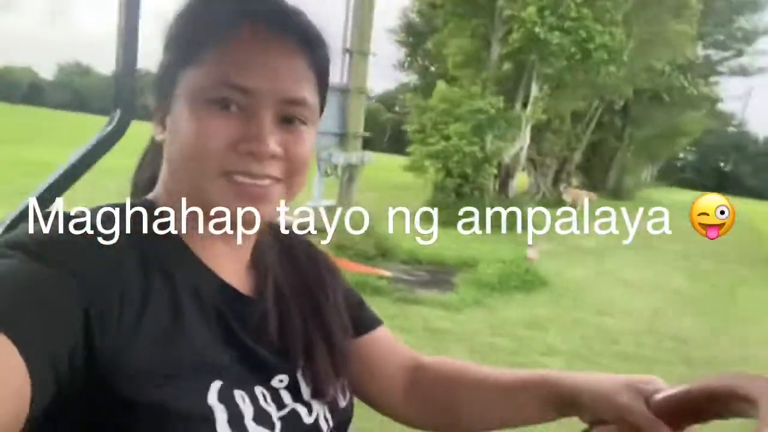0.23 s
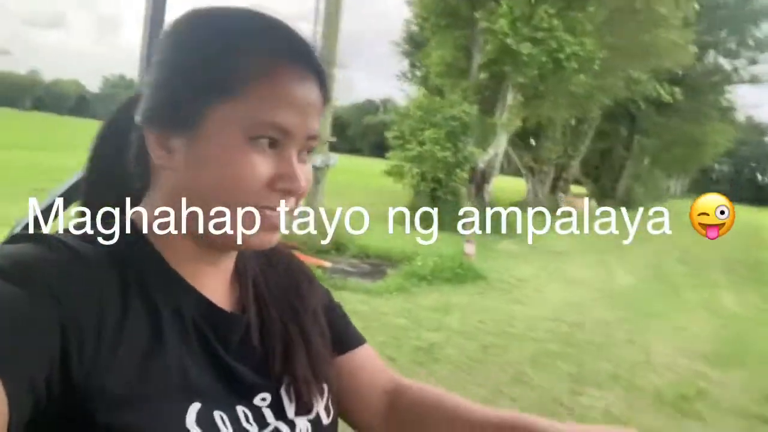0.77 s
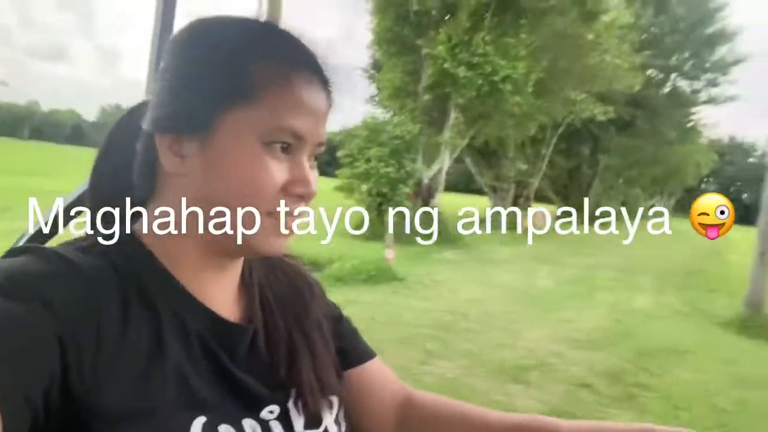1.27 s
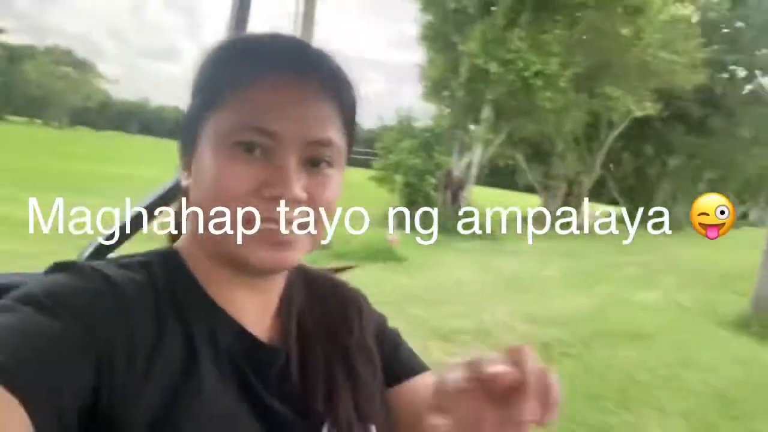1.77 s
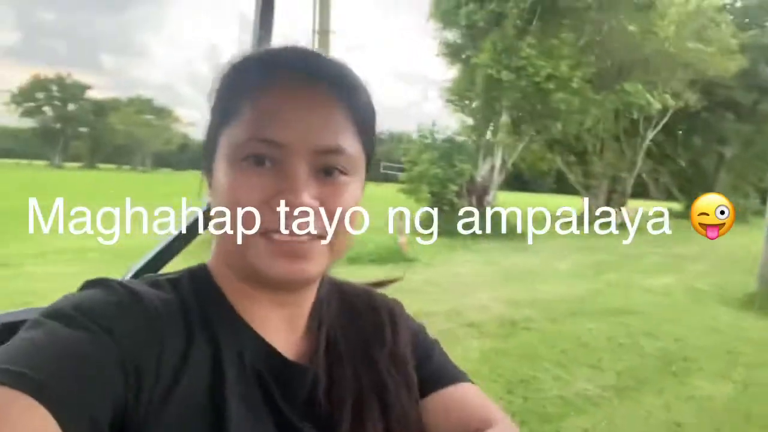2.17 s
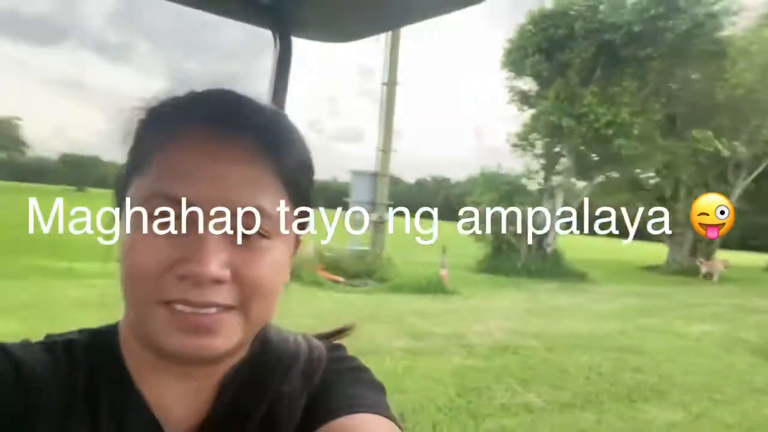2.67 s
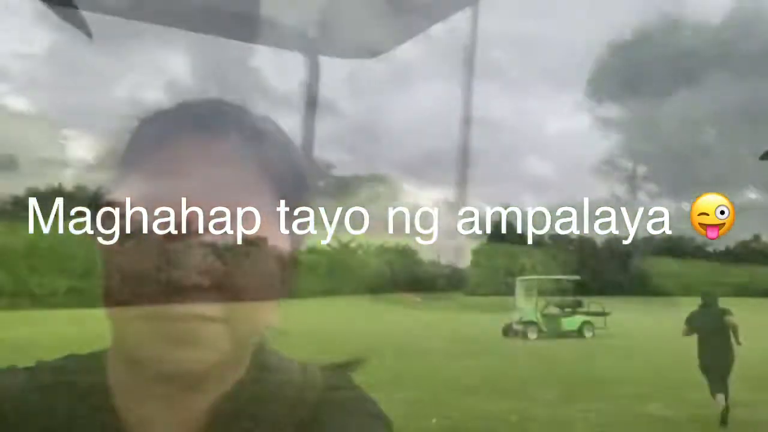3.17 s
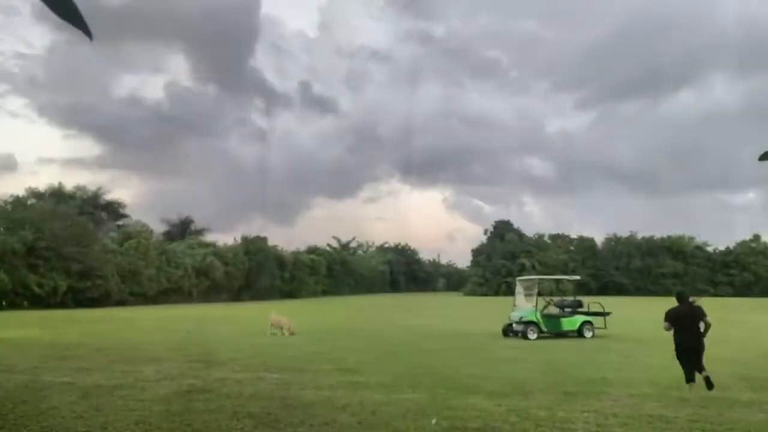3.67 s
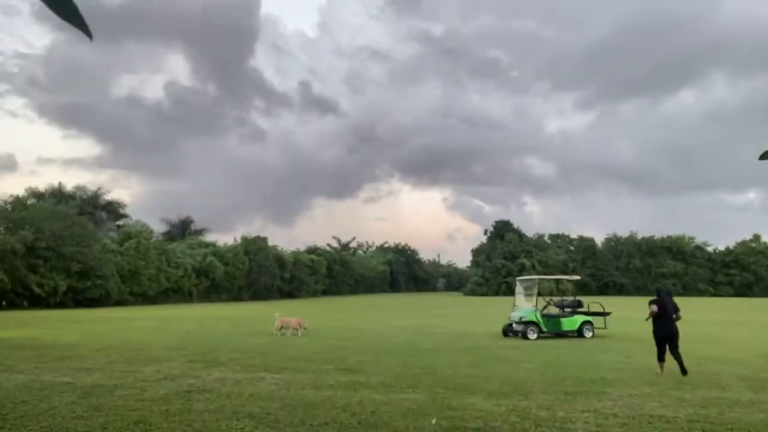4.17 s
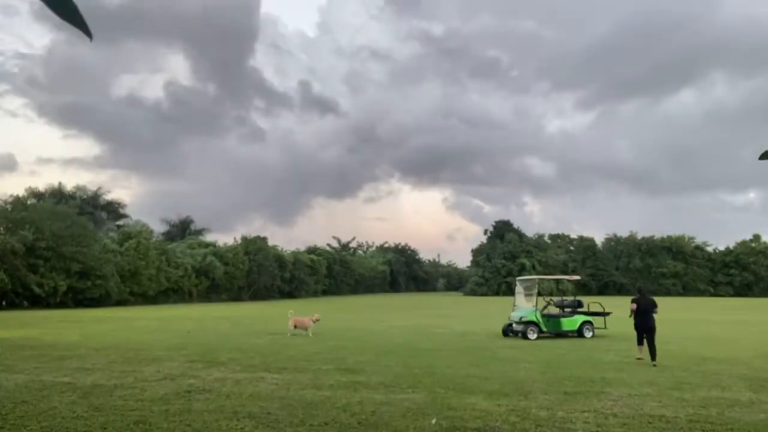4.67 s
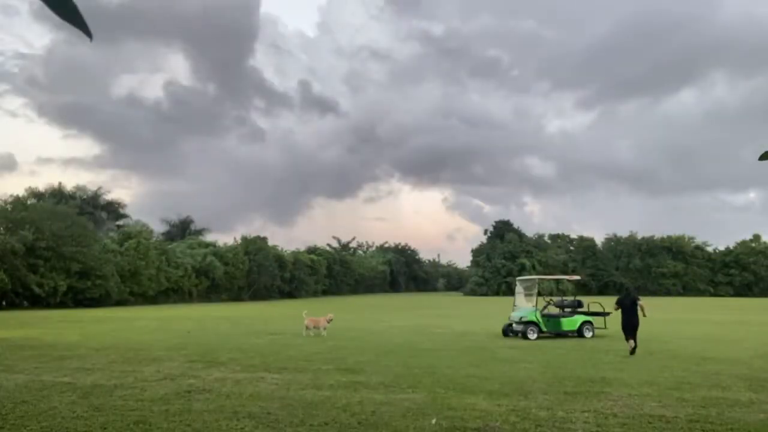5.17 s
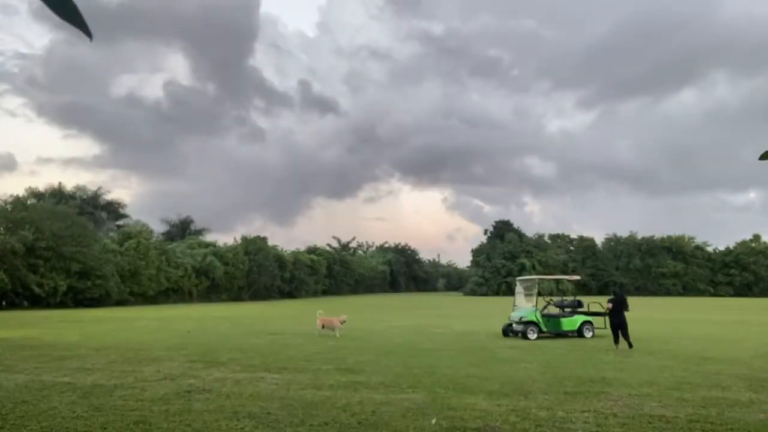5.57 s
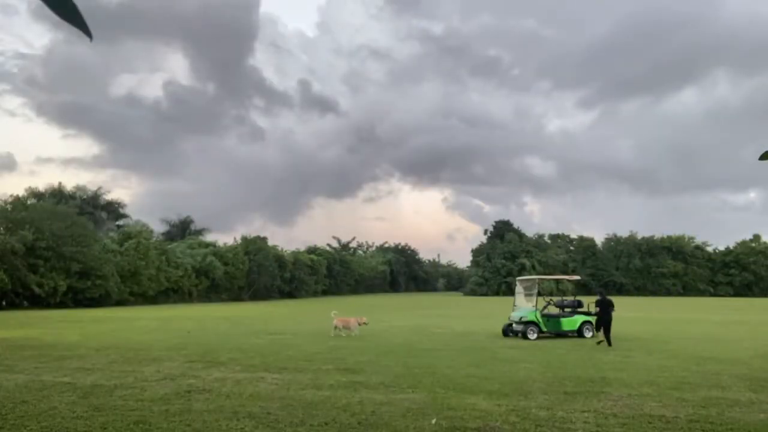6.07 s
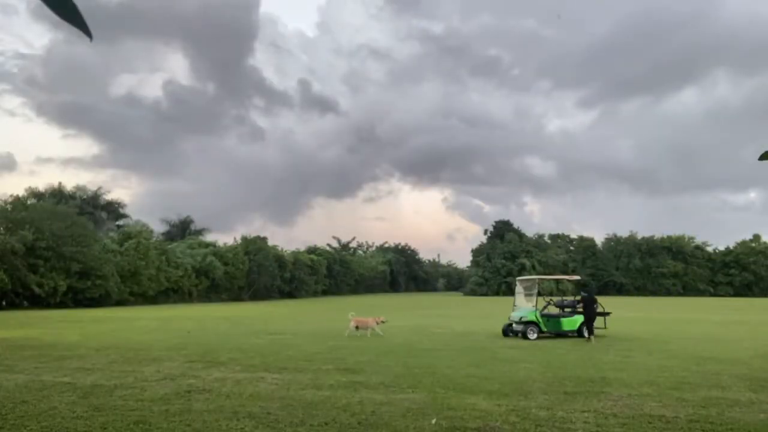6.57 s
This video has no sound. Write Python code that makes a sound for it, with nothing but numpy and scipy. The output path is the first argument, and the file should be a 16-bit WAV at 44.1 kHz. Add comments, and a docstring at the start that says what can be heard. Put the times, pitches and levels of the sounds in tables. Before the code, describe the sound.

A golf cart drives over a lawn, heard from the seat: a low engine drone that picks up a little speed, rumbling tyres and loose panels rattling on bumps. The ride cuts off abruptly, and a much quieter open field fades in. Crickets chirp in short, high phrases over a low traffic rumble, while a far car slowly speeds up and a distant motor hum swells once.

```python
"""A golf cart drones over a lawn, heard from the seat. Its engine picks up speed and kicks the body's
resonances, the tyres rumble, loose panels and fittings rattle on bumps. The ride cuts off and an open
field at dusk fades in: a low traffic rumble, a far car speeding up, a motor's hum, crickets chirping
with their wings in the hedge, a few brushes of grass and one faint bird peep."""
import sys
import numpy as np
from scipy.fft import rfft, irfft, next_fast_len
from scipy.io import wavfile
from scipy.ndimage import map_coordinates

SR = 44100
rng = np.random.default_rng(int(sys.argv[2]) if len(sys.argv) > 2 else 0)


def generate_wav(sig):
    """Save sig (samples, or channels by samples) to the path in sys.argv[1] as 16-bit PCM at SR."""
    pcm = np.round(np.clip(np.atleast_2d(sig).T, -1, 1) * 32767).astype(np.int16)
    wavfile.write(sys.argv[1], SR, pcm)


N = 300321
CUT_S = 2.652  # the ride ends

# noise spectra (frequency [Hz], relative density [dB])
RUMBLE_SPECTRUM = [(20, -38), (32, -27), (48, -6), (68, 3), (90, -0.5), (115, -6.5), (145, -1.5),
                   (180, -14.5), (230, -17.5), (340, -64), (600, -120)]
ROAD_SPECTRUM = [(120, -39), (230, -0.5), (400, -1), (500, -2.5), (650, 0.5), (950, -3.5), (1400, -14.5),
                 (2000, -25.5), (3000, -42), (5000, -44), (8500, -51), (10000, -76)]
TYRE_SPECTRUM = [(18, -41), (33, -7), (50, -6.5), (80, -1.5), (120, -3.5), (170, -2), (240, -12.5),
                 (330, -16), (700, -38.5), (1500, -45)]
CLATTER_SPECTRUM = [(150, -17.5), (300, 3), (600, 7), (1000, 0.5), (1650, -3.5), (2150, -4), (2600, -8.5),
                    (3400, -12), (4900, -18), (6300, -16.5), (8300, -21), (10000, -58.5), (13500, -28)]
CRACK_SPECTRUM = [(200, -8.5), (600, 11.5), (1400, -3), (2500, 0), (3600, -2), (5000, -11), (6500, -5.5),
                  (9000, -21), (13500, -22.5)]
# stereo image (frequency [Hz], left-right correlation [-1..1])
FIELD_CORR = [(60, 1), (130, 0.78), (280, -0.041), (610, -0.17), (1300, -0.24), (3000, 0.22)]
TYRE_CORR = [(30, .94), (130, 0.9), (250, 0.49), (420, 0.28), (700, 0)]
CART_CORR = [(130, 1), (250, 0.51), (420, 0.65), (700, -0.22), (1300, 0.27), (2000, -0.4), (3500, .1),
             (6000, 0.071), (8500, -0.45), (12000, 0.93)]

# far car's engine (time [s], firing rate [Hz])
CAR_FIRING = [(2.7, 120), (5.0, 166.5), (5.6, 181), (5.9, 193), (6.81, 220.5)]
# its harmonics 1-5 when nearest, before exhaust gain (level [dB])
CAR_HARMONICS_DB = [-57, -57.5, -70.5, -80, -77]
# its exhaust resonances (frequency [Hz], half-width [Hz], gain [dB])
EXHAUST_MODES = [(171, 17.3, 11), (332, 12.7, 4.5), (625, 34, 13), (995, 28, 10)]
# grass brushes (time [s], half-width [s], level [dB])
GRASS_BRUSHES = [(3.384, .03, -78), (3.737, .035, -75.5), (4.06, .035, -80.5)]
# dry grass ticks (time [s], level [dB])
GRASS_TICKS = [(3.655, -76.5), (3.853, -78), (5.455, -74), (5.7, -82)]
# far crickets (first phrase [s], pitch [Hz], level [dB])
FAR_CRICKETS = [(2.72, 6340, -62.5), (2.8, 6620, -66), (2.86, 6430, -61)]
# near cricket's phrases (start [s], chirps [count])
NEAR_PHRASES = [(2.936, 3), (3.211, 3), (3.48, 3), (3.785, 8), (4.305, 4), (4.635, 4), (4.972, 4),
                (5.248, 2), (5.42, 3), (5.67, 5), (6.08, 2), (6.344, 3), (6.58, 4)]

# hard knocks on bumps (time [s], relative force [dB], treble share [dB])
KNOCKS = [(0.0084, -16.5, -19), (0.0998, -13, -18), (0.1555, -19, -13.5), (0.2204, -14, -24.5),
          (0.2563, -19.5, -19), (0.3341, -12, -15.5), (0.384, -23.5, -8.5), (0.8357, -14.5, -11.5),
          (1.1012, -17.5, -19.5), (1.4048, -13.5, -10.5), (1.497, -12.5, -15), (1.607, -13, -18),
          (1.724, -13.5, -22.5), (1.7668, -16, -18), (1.8425, -11.5, -10.5), (2.0353, -17.5, -17.5),
          (2.2105, -20, -13), (2.4955, -15.5, -23.5)]
# ring of the fittings (frequency [Hz], relative level [dB], t60 [s])
FITTING_MODES = [(415, 2.5, 0.13), (556, 2, 0.056), (864, -2, 0.16), (1022, -1, 0.052), (1520, -3.5, .06),
                 (1685, -7, 0.05), (2010, 2.5, 0.055), (2230, -5, 0.056), (2530, -1.5, 0.055),
                 (3340, -10.5, 0.049), (3480, -10, 0.046), (4120, -11, .055), (4600, -12, .045),
                 (6090, -20.5, .05)]
# cart body resonances (frequency [Hz], width [Hz], relative gain [dB])
BODY_MODES = [(301, 45, -8), (381.2, 16, -0.5), (408.4, 19, 4.5), (485, 25, -5.5), (564.3, 24, 2.5),
              (599, 33, 1), (625.3, 30, -7.5), (745, 23, -7), (938, 56, -17.5), (1033, 15, -8),
              (1070.5, 30, -7), (1131, 22, -10), (1419, 30, -12), (1582, 18, -28.5), (1970, 22, -20),
              (2420, 23, -25.5), (3030, 24, -21.5)]
# body shake (time [s], relative level [dB])
BODY_SHAKE = [(0, -23.5), (.85, -25), (1.05, -29), (1.75, -23), (2.0, -21.5), (2.2, -24), (2.65, -25)]
# cart boom: level of an engine order by pitch (frequency [Hz], level [dB])
ORDER_LEVELS = [(33, -40), (69, -33), (76, -22.5), (97, -18.5), (108, -13), (115, -17.5), (135, -22),
                (149, -28.5), (164, -34.5), (178, -26), (191, -25)]
# cart engine sags, then speeds up (time [s], cycle rate [Hz])
ENGINE_RATE = [(0, 33.6), (.39, 32.4), (.65, 32.4), (.91, 33.1), (1.69, 36.8), (2.21, 38.05), (2.65, 38.25)]


def amp(db):
    """Decibels to gain."""
    return 10 ** (np.asarray(db) / 20)


def unit(x):
    """Scale to rms 1."""
    return x / np.sqrt(np.mean(x ** 2) + 1e-20)


def time_s():
    """Time of each sample."""
    return np.arange(N) / SR


def along(points, hz):
    """Interpolate (frequency [Hz], value) on a log axis."""
    knots_hz, values = np.transpose(points)
    return np.interp(np.log(hz + 1), np.log(knots_hz + 1), values)


def curve(points):
    """Interpolate (time [s], value) per sample."""
    return np.interp(time_s(), *np.transpose(points))


def wobble(rate_hz):
    """Smooth random curve with knots at rate_hz."""
    return map_coordinates(rng.standard_normal(int(N * rate_hz / SR) + 4), [time_s() * rate_hz])


def swell(centre_s, half_width_s):
    """Gaussian envelope."""
    return np.exp(-np.minimum(((time_s() - centre_s) / half_width_s) ** 2, 50))


def filtered(x, response):
    """Apply the frequency response response(hz)."""
    size = next_fast_len(N + SR // 2)
    return irfft(rfft(x, size) * response(np.fft.rfftfreq(size, 1 / SR)), size)[..., :N]


def spread(pair, corr):
    """Mix two signals as mid and side toward a left-right correlation, rms 1."""
    angle = lambda hz: np.arccos(np.clip(along(corr, hz), -1, 1)) / 2
    mid, side = filtered(pair, lambda hz: np.array([np.cos(angle(hz)), np.sin(angle(hz))]))
    return unit(np.array([mid + side, mid - side]))


def noise(spectrum, corr):
    """Coloured stereo noise, rms 1."""
    return spread(filtered(rng.standard_normal((2, N)), lambda hz: amp(along(spectrum, hz))), corr)


def band(centre_hz, half_width_hz):
    """Steep band of stereo noise, rms 1."""
    response = lambda hz: 1 / (1 + ((hz - centre_hz) / half_width_hz) ** 4)
    return unit(filtered(rng.standard_normal((2, N)), response))


def pan(left_db):
    """Stereo gains, left over right by left_db."""
    return amp([[left_db / 2], [-left_db / 2]])


def far_car(nearest_s=6.55, approach_db_per_s=2.34):
    """A rising engine note comes nearer; harmonics boom as they cross exhaust resonances."""
    firing_hz = curve(CAR_FIRING)
    phase = 2 * np.pi * np.cumsum(firing_hz + wobble(9.4)) / SR
    distance_db = -approach_db_per_s * np.abs(time_s() - nearest_s)
    note = 0
    for k, db in enumerate(CAR_HARMONICS_DB, 1):
        boom_db = sum(gain_db / (1 + ((k * firing_hz - hz) / half_width_hz) ** 6)
                      for hz, half_width_hz, gain_db in EXHAUST_MODES)
        note += amp(db + distance_db + boom_db + 2.5 * wobble(7.6)) * np.sin(k * phase)
    return np.sqrt(2) * note


def far_motor(hum_hz=286):
    """A steady hum with its octave swells once."""
    phase = 2 * np.pi * np.cumsum(hum_hz + 1.293 * wobble(14)) / SR
    level_db = -66 + 12.5 * swell(5.63, 0.39) + 2.5 * wobble(8)
    return amp(level_db) * (np.sin(phase) + amp(-1) * np.sin(2 * phase))


def far_traffic(growth_db_per_s=0.43):
    """Rumble, a slowly growing road wash and two engines carry over the field."""
    rumble = amp(-41 + 0.27 * wobble(23)) * noise(RUMBLE_SPECTRUM, FIELD_CORR)
    road_db = -53 + growth_db_per_s * (time_s() - CUT_S) + 0.19 * wobble(25)
    road = amp(road_db) * noise(ROAD_SPECTRUM, FIELD_CORR)
    return (rumble + far_car() + far_motor()) * pan(2.7) + road * pan(0.69)


def grass():
    """Soft brushes and dry ticks."""
    brushes = sum(amp(db) * swell(s, half_width_s) for s, half_width_s, db in GRASS_BRUSHES)
    ticks = sum(amp(db) * swell(s, 0.0046) for s, db in GRASS_TICKS)
    return brushes * (band(4313, 1320) + .4 * band(9000, 4000)) + ticks * band(2800, 600)


def bird():
    """One far peep with a faint tail."""
    return amp(-74) * (swell(4.31, 0.034) + 0.15 * swell(4.39, 0.071)) * band(4050, 90)


def cricket(phrases, hz, detune, echo_db, rough, period_s=.057, half_width_s=0.015):
    """Each wing stroke is a short tone, its phase lagging on the right; the hedge echoes it twice."""
    t = np.arange(-SR // 15, SR // 15) / SR

    def stroke(pitch_hz, delay_s, lag_cycles):
        envelope = np.exp(-np.abs((t - delay_s) / half_width_s) ** 3)
        return envelope * np.sin(2 * np.pi * (pitch_hz * t - lag_cycles))

    song = np.zeros((2, N + SR))
    for start_s, chirps in phrases:
        for k in range(int(chirps)):
            pitch_hz = hz * rng.normal(1, detune)
            echoes = sum(stroke(pitch_hz, s, rng.random((2, 1))) for s in rng.uniform(.006, .028, 2))
            chirp = stroke(pitch_hz, 0, np.array([[0], [.22]])) + amp(echo_db) * echoes
            start = round((start_s + k * period_s + t[0]) * SR)
            song[:, start:start + len(t)] += amp(rng.standard_normal()) * chirp
    return song[:, :N] * (1 + rough * wobble(260))  # uneven teeth on the wing's file


def crickets(far_period_s=.355, far_chirps=4):
    """One near cricket and three evenly paced far ones, over a distant chorus and thin trills."""
    near = amp(-53) * cricket(NEAR_PHRASES, hz=6193, detune=0.0041, echo_db=-11, rough=0.34)
    far = 0
    for first_s, hz, db in FAR_CRICKETS:
        starts_s = np.arange(first_s, N / SR, far_period_s)
        phrases = [(s + rng.normal(0, 0.011), far_chirps) for s in starts_s]
        far += amp(db) * cricket(phrases, hz, detune=0.0045, echo_db=-11.5, rough=0.74)
    chorus = amp(-73 + 1.6 * wobble(18)) * band(6050, 190)
    trills = amp(-75.3) * (band(8200, 380) + amp(-14) * band(12000, 1100))
    return (near + far + chorus + trills) * pan(3.1)


def tyres():
    """Uneven low rumble of rolling on the lawn."""
    return amp(-22 + 1.8 * wobble(9)) * noise(TYRE_SPECTRUM, TYRE_CORR)


def jiggles(rate_hz=6, force_db=-22, scatter_db=2.5, treble_db=-15.5):
    """Light knocks at random times, in the columns of KNOCKS."""
    draws = rng.random((int(rate_hz * CUT_S), 2))
    return [(when * CUT_S, force_db + scatter_db * (2 * size - 1), treble_db) for when, size in draws]


def rattles(attack_s=0.00056, crack_t60_s=.04, thud_t60_s=0.085):
    """Loose parts strike and bounce once: bright crack, dull panel thud, ringing fittings."""
    t = np.arange(SR // 5) / SR
    rings = np.zeros((2, N + SR))
    crack_env, thud_env = np.zeros((2, N + SR))
    for knock_s, force_db, treble_db in list(KNOCKS) + jiggles():
        for delay_s, bounce_db in [(0, 0), (rng.uniform(0.0022, .009), -9)]:
            start = round((knock_s + delay_s) * SR)
            span = slice(start, start + len(t))
            force = amp(force_db + bounce_db) * (1 - np.exp(-t / attack_s))
            crack_env[span] += force * amp(treble_db - 60 * t / crack_t60_s)
            thud_env[span] += force * amp(-60 * t / thud_t60_s)
            for hz, db, t60_s in FITTING_MODES:
                decay = amp(db + 2.5 * rng.standard_normal((2, 1)) - 60 * t / t60_s)
                cycles = hz * rng.normal(1, .02) * t + rng.random((2, 1))
                rings[:, span] += force * decay * np.sin(2 * np.pi * cycles)
    crack = amp(12.5) * crack_env[:N] * noise(CRACK_SPECTRUM, CART_CORR)
    thud = amp(-8.5) * thud_env[:N] * spread(band(640, 430), CART_CORR)
    return amp(-10.5) * rings[:, :N] + crack + thud


def clatter(cycles, excess_hz, db_per_hz=0.32):
    """Mechanical noise pulses with the engine, more every second cycle, and flutters with the ground."""
    beat_db = 0.5 * (np.cos(2 * np.pi * cycles) + 0.45 * np.cos(np.pi * cycles))
    pulsing = noise(CLATTER_SPECTRUM, CART_CORR) * amp(beat_db + 1.26 * wobble(90))
    return amp(-25 + db_per_hz * excess_hz) * unit(pulsing)


def chatter(excess_hz, db_per_hz=1.4):
    """Thin metal chatter sets in as the engine speeds up."""
    return amp(-46 + db_per_hz * excess_hz + 3 * wobble(45)) * band(3300, 800)


def body(cycles, scatter_db=4, rough=.45):
    """Each engine cycle kicks the body's resonances; ground shake blurs them."""
    starts = np.flatnonzero(np.diff(np.floor(cycles)))
    kicks = np.zeros(N)
    kicks[starts] = amp(scatter_db * rng.standard_normal(len(starts)))
    drive = unit(kicks) * np.array([[1], [.3]]) + rough * rng.standard_normal((2, N))

    def modes(hz):
        return sum((-1) ** k * amp(db) * 1j * hz * width_hz / (mode_hz**2 - hz**2 + 1j * hz * width_hz)
                   for k, (mode_hz, width_hz, db) in enumerate(BODY_MODES))

    ringing = spread(filtered(drive, modes), corr=[(400, 0.56), (1200, 0.031)])
    return amp(curve(BODY_SHAKE) + 0.26) * ringing


def drone(engine_hz, cycles, orders=5, waver_db=1.8, jitter_rad=.16):
    """Low engine orders, nearly pure; each swells as it passes through a boom of the cart."""
    tones = 0
    for k in range(1, orders + 1):
        level_db = along(ORDER_LEVELS, k * engine_hz) + waver_db * wobble(23)
        phase = 2 * np.pi * (k * cycles + rng.random()) + jitter_rad * wobble(20)
        tones += amp(level_db) * np.sin(phase)
    return np.sqrt(2) * tones


def cart():
    """Engine, tyres, body and loose parts, all close to the seat."""
    engine_hz = curve(ENGINE_RATE)
    cycles = np.cumsum(engine_hz) / SR
    excess_hz = engine_hz - np.mean(ENGINE_RATE, axis=0)[1]
    low = drone(engine_hz, cycles) + tyres()
    middle = body(cycles)
    high = clatter(cycles, excess_hz) + chatter(excess_hz)
    return low * pan(1.4) + middle * pan(-1.7) + high * pan(1.5) + rattles() * pan(3)


def scene(cut_ramp_s=0.0065, fade_s=1.49):
    """The ride cuts off; the field fades in."""
    ride_gate = np.clip((CUT_S - time_s()) / cut_ramp_s + .5, 0, 1)
    fade_in = np.clip((time_s() - CUT_S) / fade_s, 0, 1) ** 1.22
    field = far_traffic() + crickets() + grass() + bird()
    return ride_gate * cart() + fade_in * field


def record(dry):
    """Steep low-pass."""
    cutoff_hz, edge_hz = 13800, 400
    return filtered(dry, lambda hz: np.clip((cutoff_hz - hz) / edge_hz + .5, 0, 1))


dry = scene()
out = record(dry)
generate_wav(out)
```